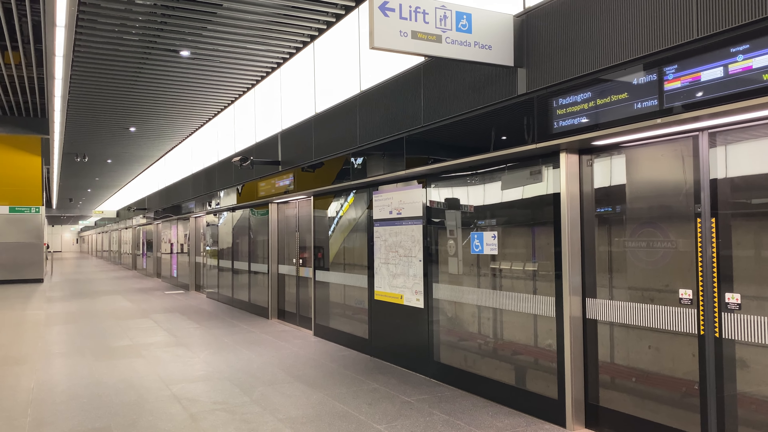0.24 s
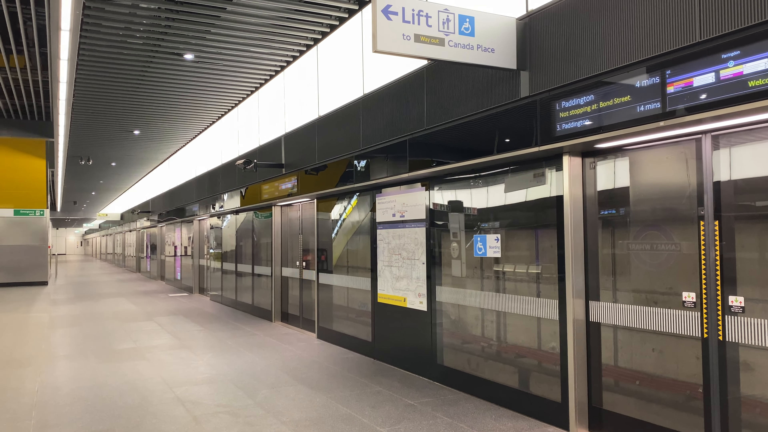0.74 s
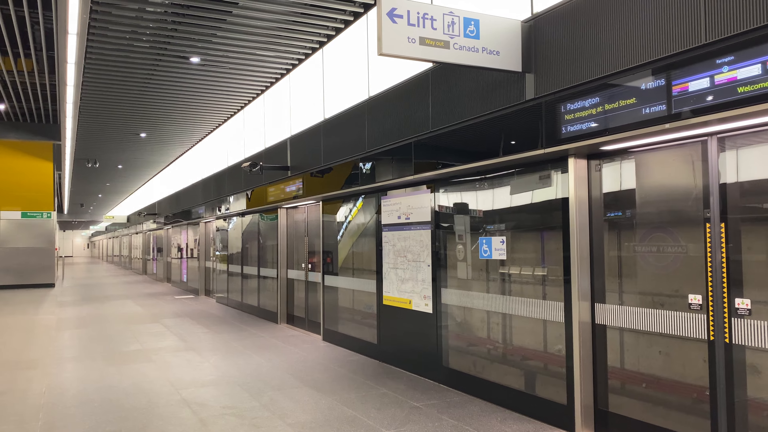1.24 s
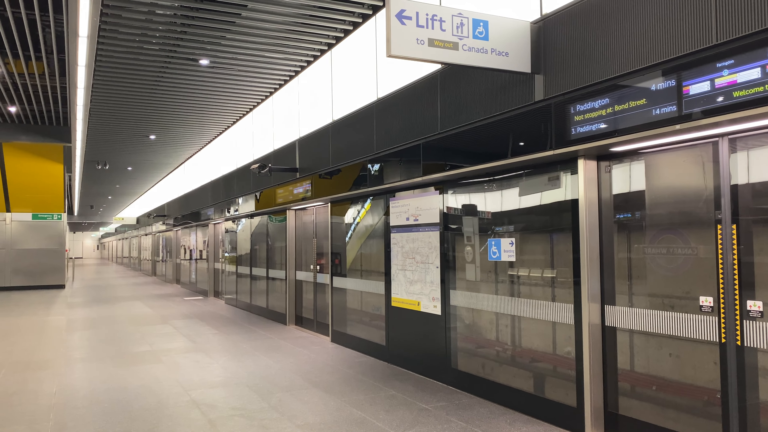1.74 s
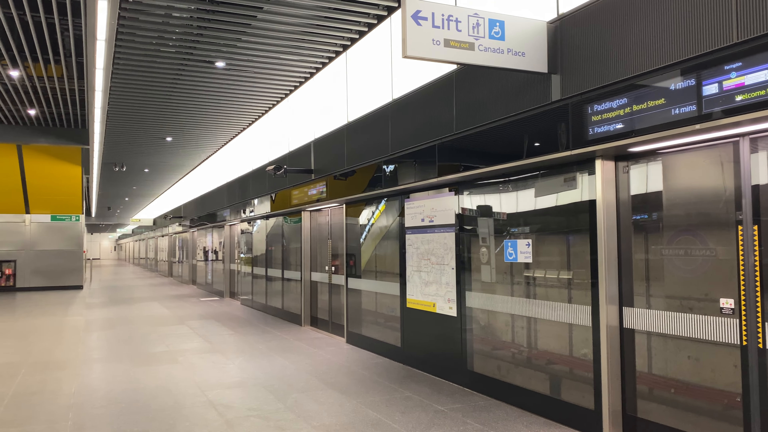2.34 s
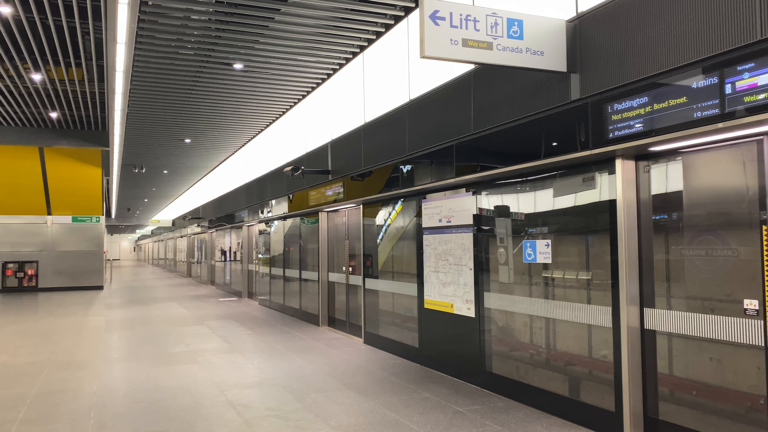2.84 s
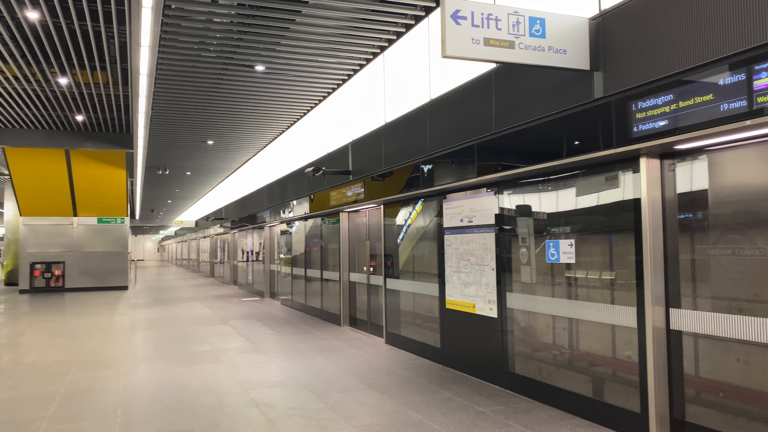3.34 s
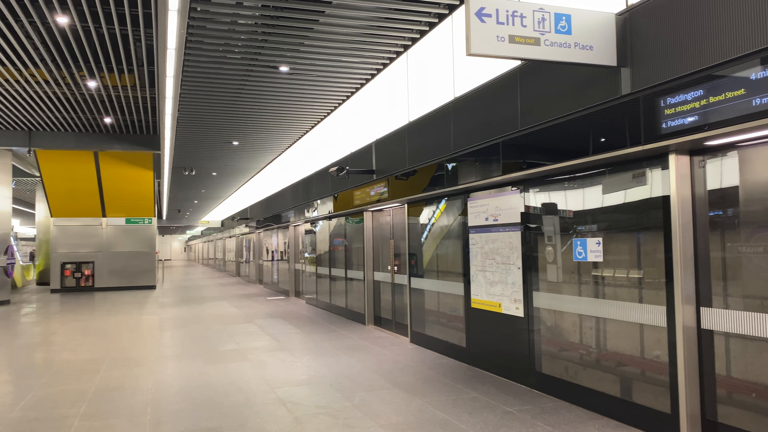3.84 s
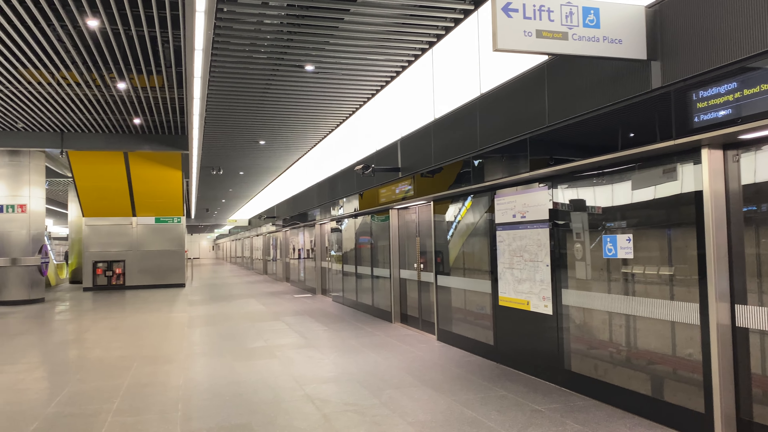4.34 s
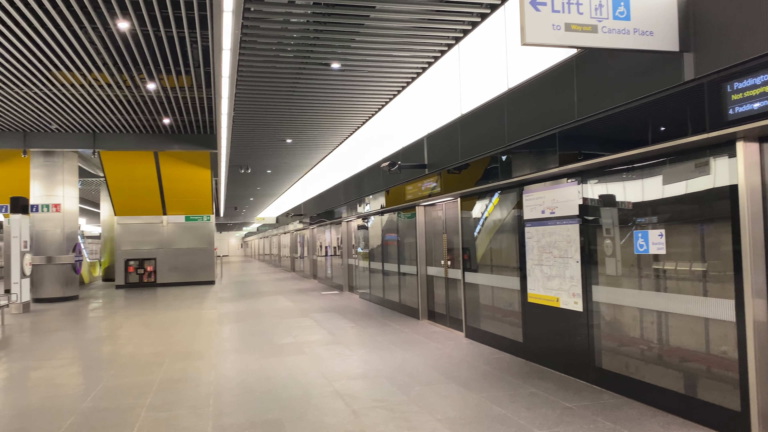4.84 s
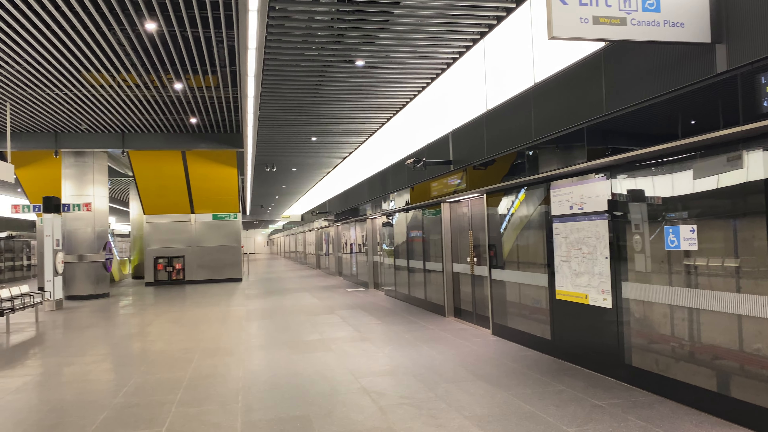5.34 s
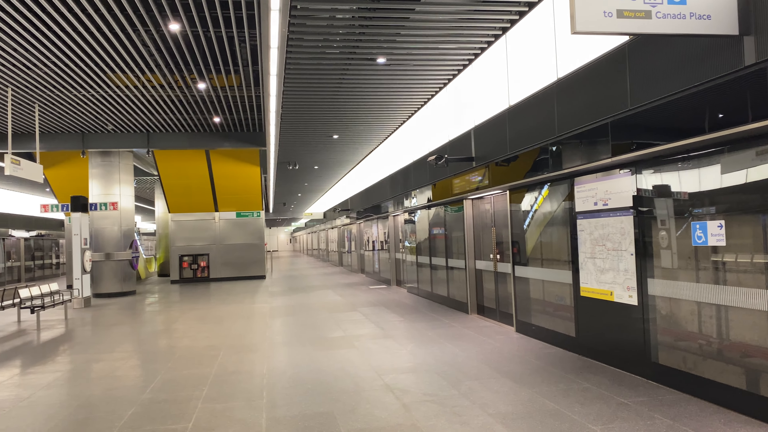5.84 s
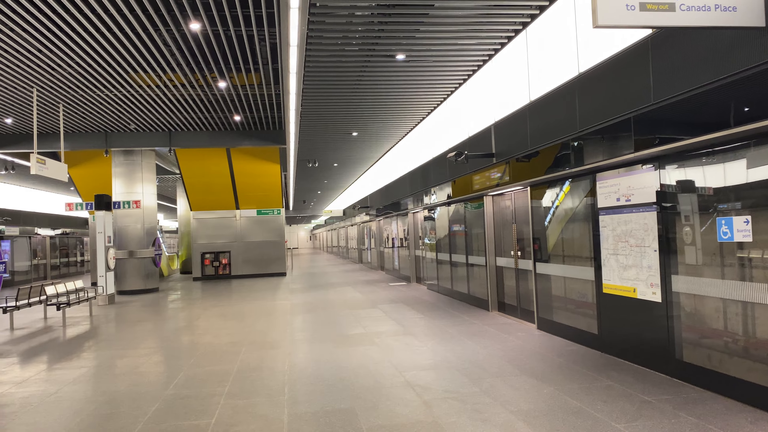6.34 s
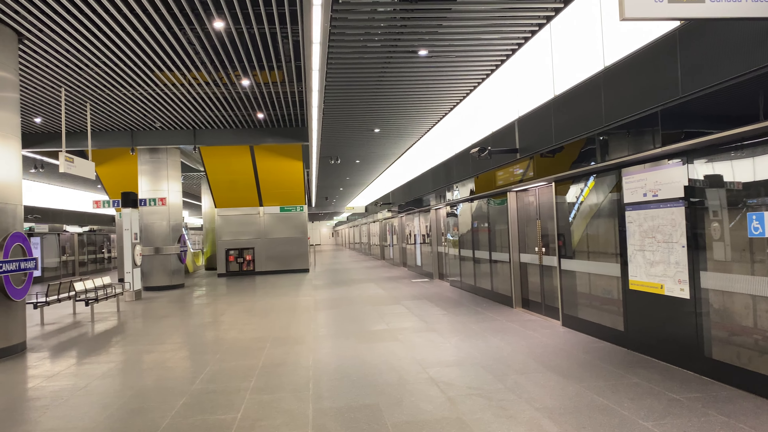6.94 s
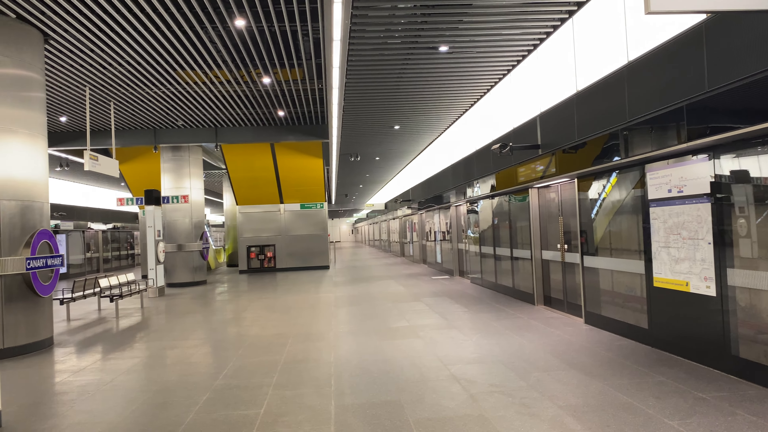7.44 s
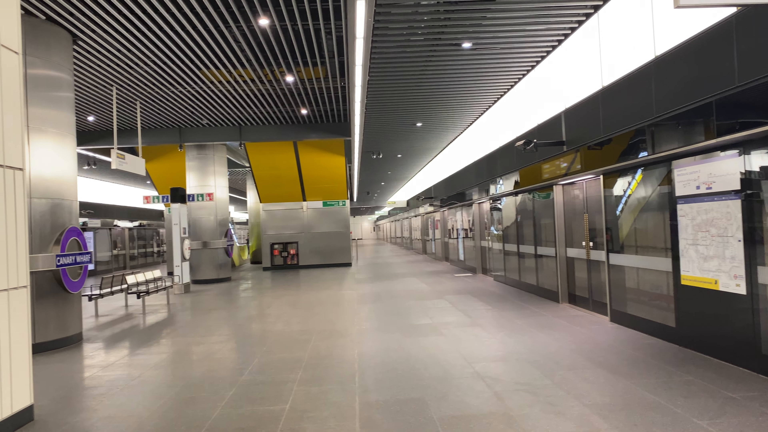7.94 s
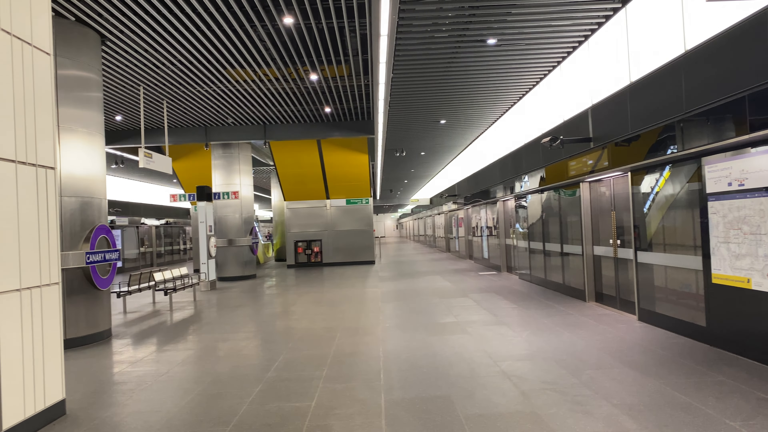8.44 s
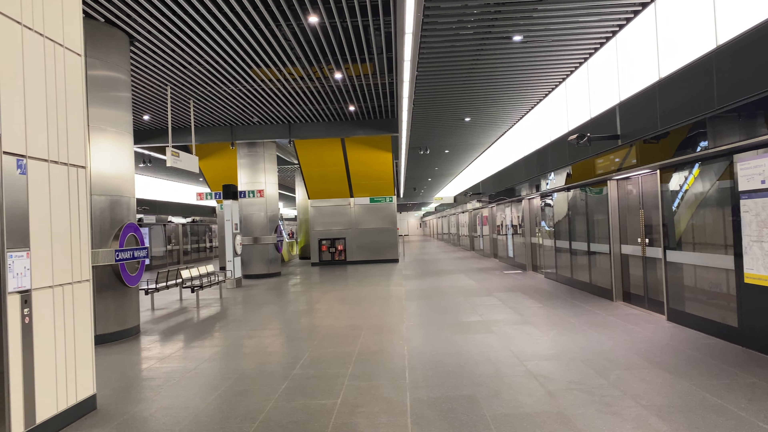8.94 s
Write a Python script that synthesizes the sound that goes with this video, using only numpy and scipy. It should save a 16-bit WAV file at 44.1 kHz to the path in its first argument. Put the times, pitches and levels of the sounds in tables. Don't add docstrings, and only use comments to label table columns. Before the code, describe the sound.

Stereo phone pickup on a long, reverberant underground platform. From 0 s an electric train is already moving off, near its loudest: a low gear drone around 140 Hz with wavering overtones and a blurred motor whine, above track rumble, midrange rail roar and soft wheel hiss. The drone climbs, quickly at first and then more slowly, nearing 180 Hz by the end, surging unevenly and swelling around 1.8 s. From about 2.4 to 3 s its upper tone drops as cars enter the tunnel; by 4 to 5 s the train is much quieter, ending as distant rumble. A very faint thin electrical whine dims after 3.7 s. Small metallic clinks ring faintly at 3.1 s, in a loose cluster at 5.1 to 5.3 s, at 6 s, most clearly at 7.5 s, and again at 8.4 s. Steady low fans, airy vents and barely audible lamp whine continue throughout, to about 9.2 s.

```python
import sys
import numpy as np
from scipy import signal
from scipy.fft import rfft, irfft, next_fast_len
from scipy.io import wavfile
from scipy.ndimage import uniform_filter1d, map_coordinates

SR = 44100
rng = np.random.default_rng(int(sys.argv[2]) if len(sys.argv) > 2 else 0)


def generate_wav(sig):
    pcm = np.round(np.clip(np.atleast_2d(sig).T, -1, 1) * 32767).astype(np.int16)
    wavfile.write(sys.argv[1], SR, pcm)


def how_loud(loudness_db):
    steps = np.asarray(loudness_db, float) / 20
    return 10 ** steps


N = 404838
TIME_S = np.arange(N) / SR

# start_s, loss_db
DISTANCE_LOSS = [(0, 1.5), (.3, 0.5), (1.5, -1), (2.3, -2.5), (2.8, -5), (3.4, -5.5), (4.1, -10), (5, -13),
                 (6.3, -14), (7, -16.5), (7.4, -17), (7.75, -16.5), (8.2, -18.5), (9.18, -19)]


def unit(x):
    return x / np.sqrt(np.mean(np.abs(x) ** 2) + 1e-20)


def along(points, hz):
    point_hz, value = np.transpose(points)
    return np.interp(np.log(hz + 1), np.log(point_hz + 1), value)


def curves(rows):
    start_s, *columns = np.transpose(rows)
    return [np.interp(TIME_S, start_s, column) for column in columns]


def wobble(rate_hz):
    coarse = np.arange(0, N + 32, 32)
    knots = rng.standard_normal(2000)
    return np.interp(np.arange(N), coarse, map_coordinates(knots, [coarse * rate_hz / SR]))


def filtered(x, response):
    size = next_fast_len(N + 8192)
    return irfft(rfft(x, size) * response(np.fft.rfftfreq(size, 1 / SR)), size)[..., :N]


def rush(spectrum, patchy_db):
    bins = signal.stft(rng.standard_normal((2, N + 1024)), nperseg=1024)[2]
    patches = uniform_filter1d(rng.standard_normal(bins.shape[1:]), size=4, axis=0)
    patches = unit(uniform_filter1d(patches, size=40, axis=1))
    pair = signal.istft(bins * how_loud(patchy_db * patches), nperseg=1024)[1][:, :N]
    return unit(filtered(pair, lambda hz: how_loud(along(spectrum, hz)) * (hz < spectrum[-1][0])))


def tone(hz, blur, steady):
    spin = np.exp(2j * np.pi * np.cumsum(hz * np.ones(N)) / SR)
    drift = [steady + wobble(blur) + 1j * wobble(blur) for _ in range(2)]
    return np.sqrt(2) * np.real(unit(np.array(drift)) * spin)


def tooth_rate():
    start_hz, top_hz, speedup_s = 140, 188, 4.8
    return top_hz - (top_hz - start_hz) * np.exp(-TIME_S / speedup_s)


def crossing(hz, centre_hz, width_hz):
    return -12 * (1 - np.exp(-0.5 * ((hz - centre_hz) / width_hz) ** 2))


def drive():
    # start_s, tooth_line_db, upper_sideband_db
    effort = [(0, -20.5, -26.5), (.45, -25, -30), (.95, -22.5, -30), (1.3, -25, -33.5), (1.75, -17, -33),
              (2.1, -31.5, -27.5), (2.5, -36.5, -26), (2.9, -24, -25), (3.45, -27.5, -26),
              (3.75, -34.5, -31), (4.5, -37.5, -31.5), (5.3, -30.5, -29), (5.85, -41.5, -34.5),
              (6.2, -48, -33.5), (6.6, -34.5, -31.5), (6.9, -41.5, -38), (7.8, -48, -42),
              (9.18, -35.5, -43)]
    # order, level_db, resonance_hz, width_hz
    motor_orders = [(4, -35, 820, 230), (6, -37, 1114, 60), (16, -50, 2100, 110)]
    steady = 1.9
    hz = tooth_rate()
    shaft_hz = hz / 12.6
    loss_db, = curves(DISTANCE_LOSS)
    first, upper = how_loud(curves(effort))

    low = first * (tone(hz, blur=7, steady=steady) + 0.2 * tone(hz - shaft_hz, blur=6.5, steady=0.77))
    low += upper * tone(hz + shaft_hz, blur=7, steady=steady)

    entering = np.clip((TIME_S - 2.42) / 0.59, 0, 1)
    second = how_loud(-27 + 0.7 * loss_db - 14 * entering)
    low += second * (1.01 * tone(2.015 * hz, blur=9, steady=steady)
                     + 0.5 * tone(2 * (hz - shaft_hz), blur=18, steady=0.62))

    pull = uniform_filter1d(np.hypot(first, upper), size=SR)
    skirt = 0.42 * pull * tone(0.98 * hz, blur=40, steady=0)
    skirt += how_loud(-27 + 1.05 * loss_db) * tone(1.97 * hz, blur=90, steady=0)

    whine = 0
    for order, level_db, resonance_hz, width_hz in motor_orders:
        order_hz = order * (hz + shaft_hz)
        gain_db = level_db + 0.88 * loss_db + crossing(order_hz, resonance_hz, width_hz)
        whine = whine + how_loud(gain_db) * tone(order_hz, blur=170, steady=0)
    return low + skirt + whine


def rolling():
    # pitch_hz, density_db [dB per Hz]
    bed_spectrum = [(25, -35), (45, -2.5), (75, -8.5), (100, 1), (125, 6), (200, -6.5), (240, -7),
                    (300, -16), (380, -16), (450, -41.5)]
    # pitch_hz, density_db [dB per Hz]
    rail_spectrum = [(220, -28.5), (380, 3.5), (393, -3.5), (432, 1), (538, 0), (669, -1), (761, -2.5),
                     (942, -5), (1000, -9), (1250, -3.5), (1450, -25.5), (1880, -49.5), (3190, -120)]
    # pitch_hz, density_db [dB per Hz]
    wheel_spectrum = [(1150, -30), (1350, 0), (1450, -1), (1800, -5), (2100, -6), (2600, -10), (2850, -12),
                      (3050, -17), (3600, -23), (4200, -23), (5100, -27), (6500, -34), (8600, -42),
                      (15500, -62)]
    loss_db, = curves(DISTANCE_LOSS)
    bed = how_loud(-23 + loss_db) * rush(bed_spectrum, patchy_db=-0.5)
    rail = how_loud(-28.5 + 0.81 * loss_db) * rush(rail_spectrum, patchy_db=1.47)
    wheel = how_loud(-40.5 + 0.86 * loss_db) * rush(wheel_spectrum, patchy_db=2.2)
    return bed + rail + wheel


def converter():
    switching_db = -73, -75, -91.5
    shadow_db = -7, -1, -6
    since_s = TIME_S - 3.7
    shadow = np.clip(since_s / 0.6 + 0.5, 0, 1)
    dimming_db = 1.3 * np.clip(since_s, 0, None)
    lower, upper, side = [how_loud(level_db + change_db * shadow - dimming_db)
                          for level_db, change_db in zip(switching_db, shadow_db)]
    lines = lower * tone(3450, blur=3, steady=1.5) + upper * tone(3750, blur=3, steady=1.5)
    split_hz = 1.04 * tooth_rate()
    below = tone(12000 - split_hz, blur=8, steady=0.8)
    above = tone(12000 + split_hz, blur=8, steady=0.8)
    return lines + side * (below + above)


def clinks():
    # start_s, peak_db, low_ring_db
    strikes = [
        (1.1, -88.5, -3),
        (3.129, -77.5, 9),
        (5.069, -75, -6),
        (5.225, -79.5, 6),
        (5.346, -76, -1),
        (6.009, -78, -3),
        (7.474, -63.5, 9.5),
        (8.379, -73, 3),
    ]
    # pitch_hz, level_db, t60_s
    modes = [(5800, -8, .5), (5975, -2, 1.4), (6600, -10, .3), (8300, -9, .1), (9800, -4, .5),
             (10050, -4, .7), (11610, -1, .4), (12290, -5, .3), (12900, -4, .15)]
    out, t = np.zeros((2, N + SR)), np.arange(SR) / SR
    for start_s, peak_db, low_ring_db in strikes:
        blur = 0.51 + unit(uniform_filter1d(rng.standard_normal((len(modes), 2, SR)), size=200))
        ring = 0
        for (pitch_hz, level_db, t60_s), rough in zip(modes, blur):
            decay = how_loud(level_db + (pitch_hz < 8000) * low_ring_db - 60 * t / t60_s)
            ring = ring + decay * rough * np.sin(2 * np.pi * pitch_hz * t)
        crack = np.diff(rng.standard_normal((2, SR + 1)))
        crack = crack * (1.2 * how_loud(-60 * t / 0.09) + 0.2 * how_loud(-60 * t / 0.5))
        attack = 1 - np.exp(-t / 0.003)
        first = round(start_s * SR)
        out[:, first:first + SR] += how_loud(peak_db + 2) * (ring + crack) * attack
    return filtered(out[:, :N], lambda hz: 1 / (1 + (hz / 13800) ** 14))


def station():
    # pitch_hz, density_db [dB per Hz]
    low_fans = [(20, -32), (40, -6.5), (70, -3.5), (100, 2), (150, -0.5), (215, -5), (245, -8.5),
                (330, -17.5), (380, -20), (420, -29.5), (520, -58.5)]
    # pitch_hz, density_db [dB per Hz]
    mid_fans = [(240, -30.5), (400, -13), (571, -14.5), (596, -4.5), (731, -13), (898, -1.5), (1140, -16.5),
                (1300, -3.5), (1450, -38), (1880, -61), (3190, -120)]
    # pitch_hz, density_db [dB per Hz]
    vents = [(1150, -30), (1350, 0), (1450, -3), (2100, -4), (2600, -7), (2850, -10), (3600, -11),
             (4200, -13), (5100, -18), (5700, -19.5), (6500, -20.5), (7300, -24), (8000, -30), (9000, -50)]
    # pitch_hz, density_db [dB per Hz]
    moving_air = [(7000, -30), (8000, -3), (8600, 0), (9200, 0), (9700, -1), (11500, -3), (12200, -6),
                  (13500, -8), (14300, -10), (15500, -21)]
    hall_db = -28.5, -48.5, -52.5, -78
    # pitch_hz, level_db
    lamps = [(6750, -89), (6900, -90), (7000, -85), (7100, -83), (7200, -86), (7300, -89), (7400, -90)]
    spectra = low_fans, mid_fans, vents, moving_air
    hall = sum(how_loud(level_db) * rush(spectrum, patchy_db=0.4) for spectrum, level_db in zip(spectra, hall_db))
    whine = sum(how_loud(level_db - 1) * tone(pitch_hz, blur=1.9, steady=1.2) for pitch_hz, level_db in lamps)
    return hall + whine


def microphones(pair):
    # pitch_hz, likeness [0 to 1]
    likeness = [(50, 1), (170, 0.84), (340, 0.6), (520, 0.33), (860, 0.27), (1500, 0.24), (2200, 0.11),
                (2900, 0.1), (3600, 0.39), (5500, 0.11), (6500, 0.17), (8300, 0.98), (12000, 0.99)]
    # pitch_hz, left_over_right_db
    balance = [(60, -1), (92, 1), (140, -1.5), (220, -3.5), (330, -2), (510, 0.5), (770, -0.5), (1190, -2),
               (1820, 0), (2780, -0.5)]
    # pitch_hz, lag [cycles]
    port_lag = [(0, 0), (860, .27), (1550, .46), (2250, .86), (2950, .88), (4300, 1), (5700, 1.35),
                (7000, 2), (9000, 2.5), (15200, 4)]

    def share(hz):
        angle = np.arccos(np.clip(along(likeness, hz), 0, 1)) / 2
        return np.array([np.cos(angle), np.sin(angle)])

    def ports(hz):
        way = np.array([[1], [-1]])
        lag_cycles = np.interp(hz, *np.transpose(port_lag))
        return how_loud(way * along(balance, hz) / 2) * np.exp(-1j * np.pi * way * lag_cycles)

    mid, side = filtered(pair, share)
    return filtered(np.array([mid + side, mid - side]), ports)


def scene():
    return microphones(drive() + rolling() + station() + converter() + clinks())


def low_pass(x):
    return signal.sosfilt(signal.butter(12, 15200, fs=SR, output="sos"), x)


def record(dry):
    return low_pass(dry)


dry = scene()
out = record(dry)
generate_wav(out)
```